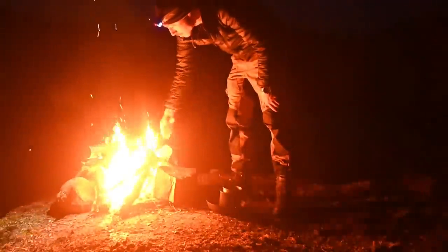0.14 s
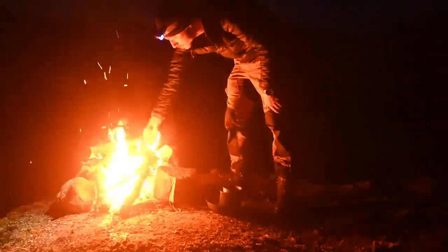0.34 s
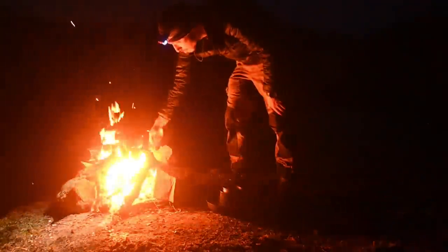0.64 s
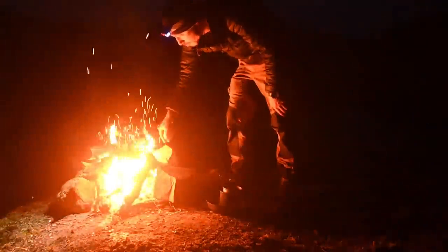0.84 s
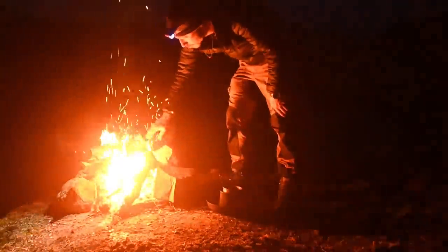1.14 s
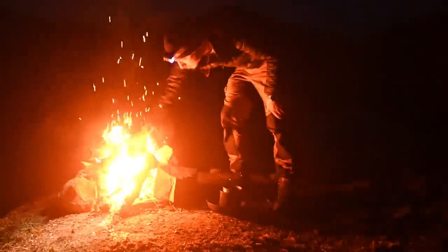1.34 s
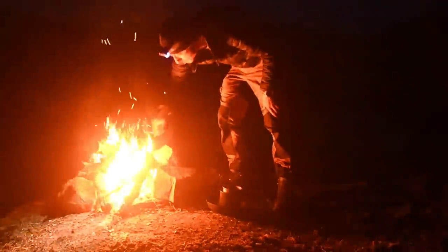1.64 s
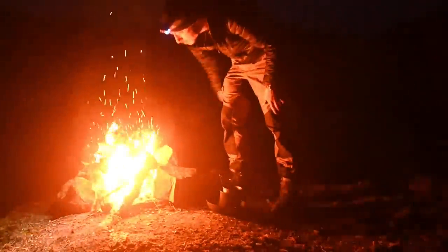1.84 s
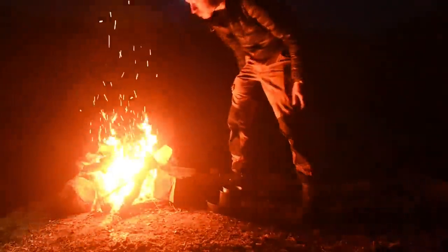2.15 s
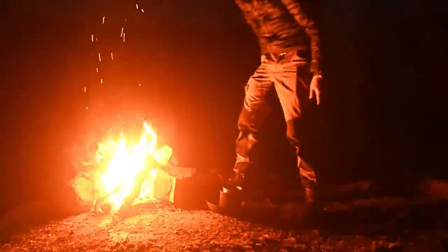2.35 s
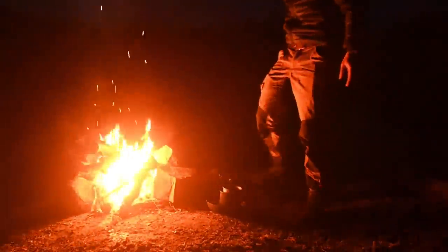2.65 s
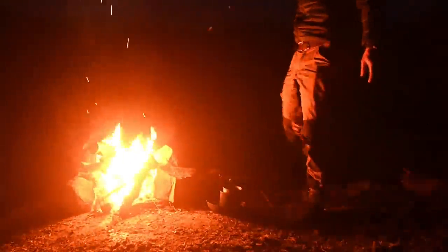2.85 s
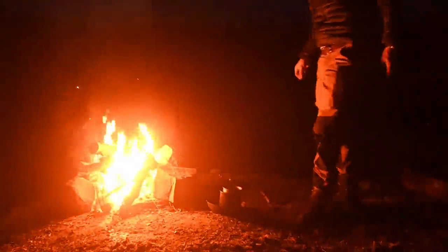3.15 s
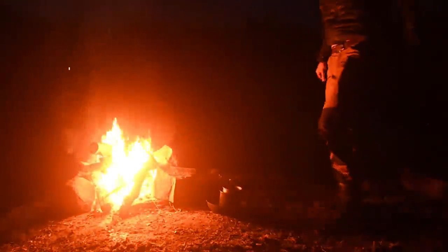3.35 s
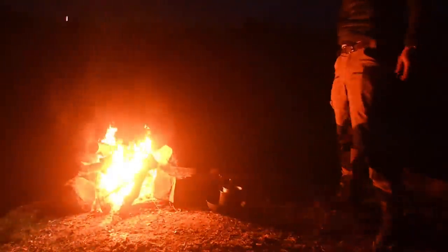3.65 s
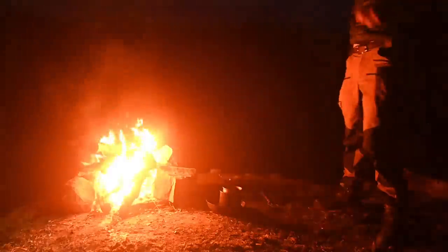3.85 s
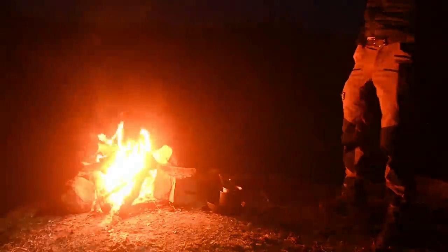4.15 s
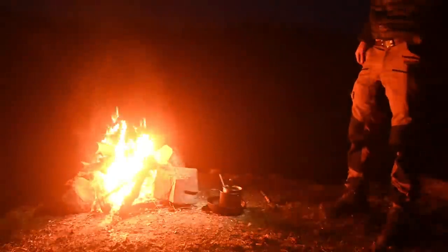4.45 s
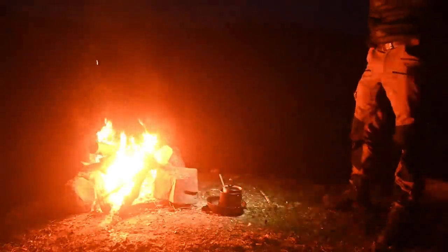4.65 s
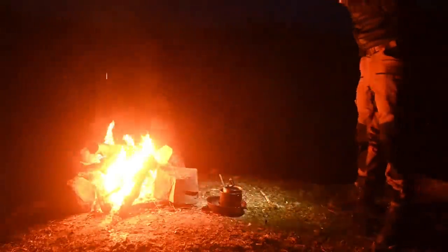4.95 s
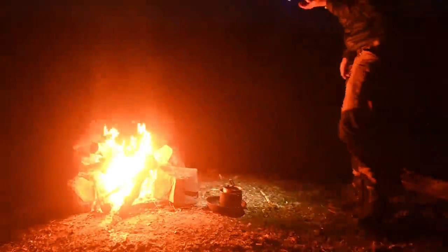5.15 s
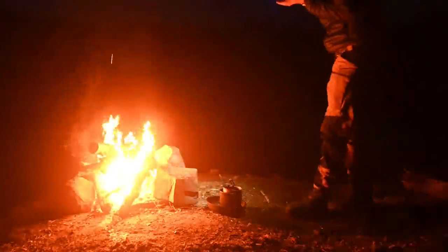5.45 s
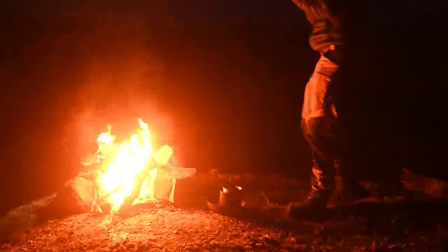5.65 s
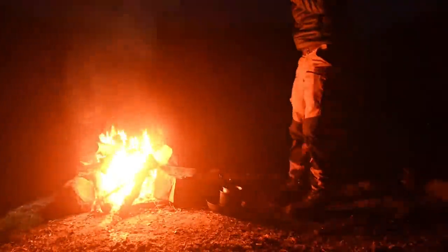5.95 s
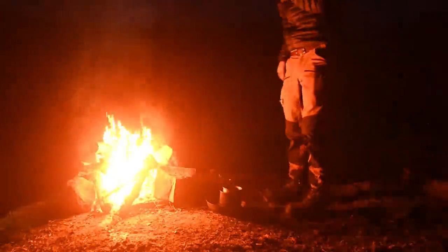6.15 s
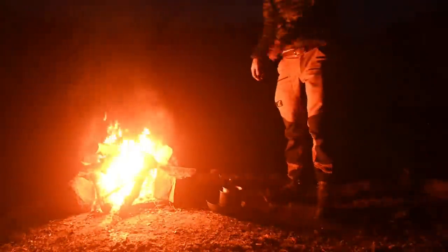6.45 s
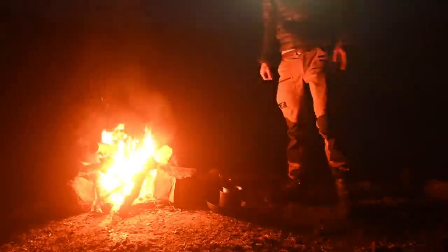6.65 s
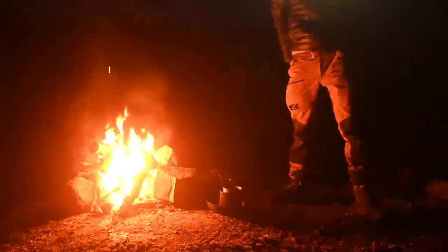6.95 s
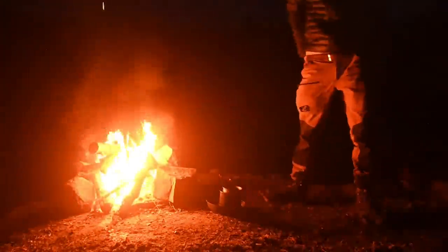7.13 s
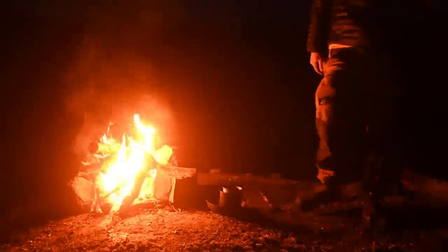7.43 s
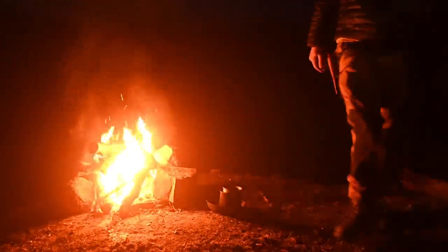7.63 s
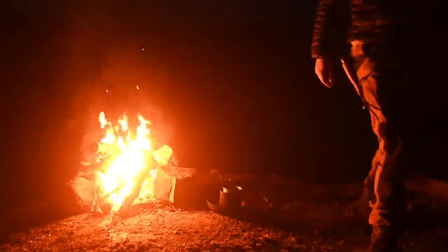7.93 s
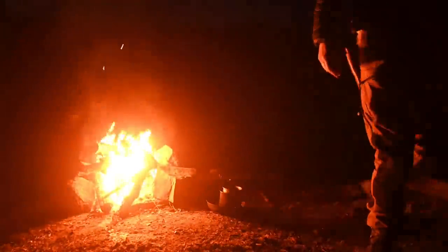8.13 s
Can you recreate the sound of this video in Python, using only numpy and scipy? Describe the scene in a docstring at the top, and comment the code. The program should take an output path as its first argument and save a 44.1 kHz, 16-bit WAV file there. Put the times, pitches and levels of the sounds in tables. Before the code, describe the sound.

Outdoors at night, a continuous high peeping of many frogs dominates, each call a quick upward glide that stops short. Several individuals repeat every second or so above the blurred distant crowd. A small wood fire close to the microphone adds a low soft roar, bright ember ticks and occasional hollow pops. Early on, wood rustles and knocks as it is moved and a log briefly scrapes; later come light steps on dry ground and a thicker run of pops.

```python
"""A lake shore at night: hundreds of small frogs whistle rising peeps; the nearer ones stand out one by one.
Each peep is a gliding stack of sine partials; the far chorus calls at random through stronger scatter.
A campfire roars softly and hisses in coloured noise; its ticks and pops are short struck resonances.
Beside it someone shifts wood and steps on dry ground: strokes of dense grains, and scrapes of peaked noise."""
import sys
import numpy as np
from scipy import signal
from scipy.fft import rfft, irfft
from scipy.io import wavfile

SR = 44100
rng = np.random.default_rng(int(sys.argv[2]) if len(sys.argv) > 2 else 0)


def unload_audio(sound):
    """Save the sound as a 16-bit wav file, at the path given as the first command line argument."""
    columns = np.transpose(np.atleast_2d(sound))
    # keep every value between -1 and 1, then stretch to whole-number steps
    steps = np.round(np.clip(columns, -1, 1) * 32767)
    wavfile.write(sys.argv[1], SR, steps.astype(np.int16))


N = 365588


def from_db(db):
    """Amplitude gain of a level in dB."""
    return 10 ** (np.asarray(db) / 20)


def rms_one(x):
    """Scale to unit rms."""
    return x / np.sqrt(np.mean(x ** 2) + 1e-20)


def add(out, start_s, sound):
    """Mix a sound in at a time, trimmed to the scene."""
    at = round(start_s * SR)
    first = max(at, 0)
    last = max(min(at + len(sound), N), 0)
    out[first:last] += sound[first - at:][:max(last - first, 0)]


def peep(length_s, start_hz, end_hz, bend, db, turn, partials):
    """One whistle, the 2nd partial of the voice: swells, glides, sags and stops short as the throat shuts."""
    t = np.arange(round(length_s * SR)) / SR
    u = t / length_s
    whistle_hz = start_hz + (end_hz - start_hz) * (u + bend * u * (1 - u))
    phase = 2 * np.pi * (turn + np.cumsum(whistle_hz) / (2 * SR))   # of the fundamental
    gate = np.clip(np.minimum(t / 0.033, (length_s - t) / 0.0055), 0, 1)
    swell = np.sin(np.pi / 2 * gate) ** 2
    voice = np.sin(2 * phase) * from_db(-6 * u ** 3)
    growth_db = -3.5 + 4.56 * u   # overtones grow as the call goes on
    for partial, rel_db in partials:
        voice += from_db(rel_db + growth_db) * np.sin(partial * phase)
    return from_db(db) * swell * voice


# Single clear peeps. Each row: start in seconds, length in seconds, end pitch in Hz, level in dB.
SINGLE_PEEPS = [(-.021, .12, 2976, -24), (-.02, .15, 3097, -32.5), (0.487, 0.16, 3090, -34),
                (.565, .11, 2714, -34), (.619, 0.15, 2973, -36.5), (0.802, .133, 3010, -31),
                (0.952, 0.22, 3002, -25.5), (1.142, 0.28, 3207, -33), (1.209, .23, 3024, -24),
                (1.332, .23, 2880, -42), (1.662, .2, 3000, -32), (1.916, 0.29, 3153, -35),
                (2.131, .19, 2730, -37), (2.282, 0.2, 2740, -38), (2.36, 0.2, 3035, -25.5),
                (2.592, .19, 2963, -33.5), (2.605, .23, 2973, -27.5), (2.642, .13, 2850, -25),
                (2.973, 0.14, 3150, -31), (3.094, 0.22, 3020, -31), (3.277, 0.22, 2900, -32.5),
                (3.444, 0.21, 2802, -37), (3.582, .16, 3170, -31), (3.901, 0.16, 2723, -37),
                (3.968, .18, 3020, -27), (4.132, 0.16, 3042, -27), (4.178, .16, 2876, -24),
                (4.279, .22, 3090, -32), (4.527, 0.17, 2922, -29), (4.698, 0.21, 2900, -33),
                (4.81, .11, 3010, -33), (5.052, 0.19, 3190, -38.5), (5.168, .21, 3190, -34),
                (5.36, 0.21, 3107, -30.5), (5.464, .23, 3080, -27.5), (5.52, 0.15, 2990, -27),
                (5.524, .25, 2960, -31.5), (5.713, 0.15, 2992, -24), (6.018, 0.19, 2900, -31),
                (6.275, 0.16, 2984, -30), (6.461, .22, 3075, -31), (6.524, .2, 2950, -36),
                (6.624, .2, 2935, -40), (6.785, 0.19, 3001, -25.5), (6.928, 0.18, 2690, -39),
                (6.963, .13, 2846, -31), (7.068, 0.25, 3037, -24), (7.103, .19, 2902, -26.5),
                (7.302, .16, 3040, -29), (7.46, .16, 2804, -32.5), (7.544, .17, 3005, -31.5),
                (7.629, 0.18, 3144, -27), (7.887, 0.28, 3050, -36.5), (8.081, .17, 2780, -39)]
# Frogs with a voice of their own, calling again and again. Each row: a voice (start pitch in Hz,
# end pitch in Hz, bend of the glide, level in dB, overtones in dB re whistle before colour and growth),
# length in seconds, list of call times in seconds.
STEADY_CALLERS = [((2960, 3400, .5, -20.6, -37), .176, [.33, 1.812, 3.124, 4.74, 6.575, 8.108]),
                  ((2790, 3125, .6, -28.5, -27), .145, [.15, 2.05, 4.768, 6.148, 7.43]),
                  ((2680, 3050, .2, -30, -27), .145, [.5, 1.662, 2.943, 4.393, 5.953, 7.212]),
                  ((2375, 2745, .25, -31.5, -43), .19, [.93, 2.362, 3.712, 5.217, 6.51, 8.176]),
                  ((2305, 2660, -.35, -44, -44), .28, [.178, 1.523, 2.912, 4.379, 5.99, 7.362])]
# Colour of the other partials. Each row: partial frequency in Hz, dB added to the overtone level.
OVERTONE_COLOUR = [(1500, -4.5), (4300, -4.5), (5000, 2), (6000, 2.5), (7300, -6), (8500, -13),
                   (10200, -20.5), (11700, -5.5)]
# glide shared by the single peeps: longer ones climb further
RISE_HZ, RISE_HZ_PER_S, BEND = 130.07, 1250, 0.1994
PEEP_OVERTONES_DB, OVERTONE_SPREAD_DB = -45, 3.5   # throats differ in brightness


def near_frogs():
    """Every listed call, with those partials that are loud enough to hear."""
    out = np.zeros(N)
    colour_hz, colour_db = np.transpose(OVERTONE_COLOUR)
    others = np.array([1, 3, 4, 5, 6, 7])
    calls = [(s, length_s, *voice) for voice, length_s, times in STEADY_CALLERS for s in times]
    brightness = rng.standard_normal(len(SINGLE_PEEPS))
    for (s, length_s, end_hz, db), odd in zip(SINGLE_PEEPS, brightness):
        start_hz = end_hz - RISE_HZ - RISE_HZ_PER_S * length_s
        overtones_db = PEEP_OVERTONES_DB + OVERTONE_SPREAD_DB * odd
        calls.append((s, length_s, start_hz, end_hz, BEND, db, overtones_db))
    turns = rng.random(len(calls))
    for (s, length_s, start_hz, end_hz, bend, db, overtones_db), turn in zip(calls, turns):
        partial_hz = others * (start_hz + end_hz) / 4
        rel_db = overtones_db + np.interp(partial_hz, colour_hz, colour_db)
        heard = db + rel_db > -88
        partials = zip(others[heard], rel_db[heard])
        add(out, s, peep(length_s, start_hz, end_hz, bend, db, turn, partials))
    return out


FAR_COUNT, FAR_RMS_DB, FAR_SPREAD_DB = 850, -31, 4   # peeps in all, chorus level, spread between peeps
FAR_HZ, FAR_SPREAD_HZ, FAR_TOP_HZ = 2874, 135, 3284   # mid-glide pitch, its spread, usual ceiling
FAR_PARTIALS_DB = [(1, -31.5), (3, -34.5), (4, -40)]   # partial number, dB re whistle before growth


def far_frogs():
    """The rest of the pond calls at random; distance strips the upper overtones."""
    out = np.zeros(N)
    draws = np.c_[rng.random((FAR_COUNT, 2)), rng.standard_normal((FAR_COUNT, 5))]
    # steady callers keep the chorus even: one peep per time slot
    for slot, (when, turn, odd_length, odd_pitch, odd_rise, odd_bend, odd_db) in enumerate(draws):
        length_s = np.clip(.16 + 0.02525 * odd_length, .1, .25)
        rise_hz = length_s * (1900 + 300 * odd_rise)
        end_hz = FAR_HZ + FAR_SPREAD_HZ * max(odd_pitch, -1.9) + rise_hz / 2
        end_hz = min(end_hz, FAR_TOP_HZ + 40 * odd_bend)
        call = peep(length_s, end_hz - rise_hz, end_hz, 0.1998 * odd_bend,
                    FAR_SPREAD_DB * odd_db, turn, FAR_PARTIALS_DB)
        add(out, (slot + when) / FAR_COUNT * (N / SR + .25) - .25, call)
    return from_db(FAR_RMS_DB) * rms_one(out)


SHORE_T60_S, NEAR_WET_DB, FAR_WET_DB = 0.57, -12, -4


def shore(x, wet_db):
    """Scatter off trees and bank: a dense, dying noise tail follows the direct sound."""
    t = np.arange(SR // 2) / SR
    tail = rng.standard_normal(len(t)) * from_db(-60 * t / SHORE_T60_S) * (t > .008)
    tail /= np.sqrt(np.sum(tail ** 2))
    return x + from_db(wet_db) * signal.fftconvolve(x, tail)[:N]


def coloured(x, spectrum):
    """Give a white signal a spectrum, interpolated over log frequency; rms 1."""
    hz, db = np.transpose(spectrum)
    bins_hz = np.maximum(np.arange(N // 2 + 1) * SR / N, 1)
    gain = from_db(np.interp(np.log(bins_hz), np.log(hz), db))
    return rms_one(irfft(rfft(x) * gain, N))


def drift(rate_hz):
    """Slow chance: random points joined by lines, spread 1 at the points."""
    steps = int(N / SR * rate_hz) + 2
    return np.interp(np.arange(N) / SR * rate_hz, np.arange(steps), rng.standard_normal(steps))


def ring(clicks, hz, cycles):
    """A unit click sets a sine ringing that dies by 60 dB in so many cycles."""
    r = from_db(-60 * hz / (cycles * SR))
    w = 2 * np.pi * hz / SR
    return signal.lfilter([0, np.sin(w)], [1, -2 * r * np.cos(w), r * r], clicks + 1e-18)


def snaps(events, cycles, crack_db, gain_db):
    """Each snap: a click and a brief dying noise crack strike a resonance of a few cycles."""
    out, t = np.zeros(N), np.arange(1200) / SR
    noises = rng.standard_normal((len(events), 1200))
    for (s, db, hz), noise in zip(events, noises):
        crack = from_db(crack_db) * noise * np.exp(-t * hz / cycles)
        add(out, s, from_db(db + gain_db) * ring((t == 0) + crack, hz, cycles))
    return out


def grains(per_s, low_hz, high_hz, cycles, uneven_db):
    """Random clicks of uneven size dealt to eight short resonances; rms 1."""
    size_db = uneven_db * np.minimum(rng.exponential(1, N), 5)
    clicks = (rng.random(N) < per_s / SR) * from_db(size_db)
    dealt, pitches_hz = rng.integers(0, 8, N), np.geomspace(low_hz, high_hz, 8)
    return rms_one(sum(ring(clicks * (dealt == k), hz, cycles) for k, hz in enumerate(pitches_hz)))


# Flame spectrum. Each row: frequency in Hz, relative level in dB per Hz.
ROAR_SPECTRUM = [(15, -4), (60, 1), (190, -0.5), (420, -7), (700, -6), (1200, -5.5), (2200, -4.5),
                 (3200, -6.5), (5000, -44.5)]
# Sap and ember spectrum. Each row: frequency in Hz, relative level in dB per Hz.
HISS_SPECTRUM = [(2200, -14.5), (3700, -1.5), (4400, -4.5), (5200, -6.5), (6500, -6), (8200, 1),
                 (10500, -11), (12800, -4.5), (14500, -9), (16500, -10.5)]
# Swing of the sap's hiss, used about its mean. Each row: time in seconds, level in dB before scaling.
SIZZLE_SWING = [(0.0, -69), (0.44, -62), (1.18, -68.5), (1.5, -60.5), (1.71, -68), (2.38, -66.5),
                (3.42, -72.5), (4.13, -68.5), (5.42, -71.5), (8.29, -65)]
# Embers crack. Each row: start in seconds, level in dB, pitch in Hz, level of the highest treble in dB;
# levels before the snap gain.
EMBER_TICKS = [(.266, -35, 6250, -56), (.4773, -36, 5040, -48), (.5526, -33, 6000, -38),
               (.6389, -31, 8140, -42), (.671, -25.5, 7740, -35), (.941, -37, 8350, -60),
               (1.3806, -31, 8000, -51), (1.4284, -24.5, 8020, -45), (1.5597, -32, 7940, -53),
               (1.579, -31.5, 7100, -57), (1.7625, -32, 5900, -69), (1.9428, -29, 8400, -34),
               (1.9987, -25.5, 5370, -56), (2.3567, -32, 7760, -58), (2.391, -36, 5200, -66),
               (2.622, -28.5, 7400, -33), (2.6643, -47, 4670, -38), (2.777, -26, 11500, -40),
               (3.4611, -33, 6200, -67), (3.5627, -38, 7380, -55), (3.7399, -34, 4700, -53),
               (3.7523, -18, 12400, -48), (3.916, -27.5, 8100, -52), (3.9421, -27.5, 8000, -51),
               (4.1288, -35.5, 7770, -53), (4.211, -26, 5500, -43), (4.225, -21.5, 7700, -44),
               (4.4154, -44, 5540, -43), (4.427, -39, 5900, -32), (4.9302, -49, 4591, -36),
               (5.0794, -35, 7840, -60), (5.853, -43, 8300, -58), (5.92, -35, 8300, -67),
               (6.0575, -46, 10500, -54), (6.292, -39, 5600, -55), (6.3131, -46, 4700, -48),
               (6.9472, -35, 8300, -47), (7.0955, -34, 8300, -55), (7.2435, -34.5, 5700, -54),
               (7.4607, -43, 5930, -48), (7.79, -34, 5910, -54), (7.9473, -36.5, 7450, -54)]
# Wood pops and knocks. Each row: start in seconds, level in dB before the snap gain, pitch in Hz.
WOOD_POPS = [(0.491, -41, 845), (1.446, -37, 317), (1.499, -36.5, 258), (1.588, -44, 300),
             (1.996, -20.5, 1420), (2.029, -36.5, 834), (2.52, -28.5, 610), (2.554, -38, 697),
             (2.69, -33, 474), (2.786, -34.5, 1130), (3.646, -40, 410), (3.747, -44, 1920),
             (3.938, -39, 1510), (4.225, -33.5, 503), (4.256, -32, 1500), (5.466, -43, 393),
             (5.971, -28, 1920), (6.031, -33.5, 1620), (6.591, -37, 1610), (7, -32, 925), (7.039, -33, 418),
             (7.094, -26.5, 955), (7.251, -43, 466), (7.786, -31.5, 940), (7.812, -26.5, 1420),
             (7.938, -32, 1490), (7.986, -29, 1550), (8.015, -28, 990), (8.215, -33.5, 620),
             (8.257, -35, 1010)]
ROAR_DB, HISS_DB = -55.5, -63.5   # before drift and swing
SIZZLE_FOLLOWS = 0.86   # share of the swing in hiss and crackle


def fire():
    """Fluttering roar, hiss, fine random crackle and patter, and the listed ticks and pops."""
    roar = from_db(ROAR_DB + 3.17 * drift(18)) * coloured(rng.standard_normal(N), ROAR_SPECTRUM)
    sizzle_db = np.interp(np.arange(N) / SR, *np.transpose(SIZZLE_SWING))
    sizzle_db = SIZZLE_FOLLOWS * (sizzle_db - sizzle_db.mean())
    hiss_db = HISS_DB + sizzle_db + 0.47 * drift(5.6)
    hiss = from_db(hiss_db) * coloured(rng.standard_normal(N), HISS_SPECTRUM)
    crackle = from_db(-67.5 + sizzle_db) * grains(50, 5000, 13000, 12, uneven_db=3.5)
    patter = from_db(-68.0) * grains(49, 200, 900, 3, uneven_db=0.5)
    bodies = [(s, db, hz) for s, db, hz, top_db in EMBER_TICKS]
    edges = [(s, top_db, 13200) for s, db, hz, top_db in EMBER_TICKS]   # the sharp edge of each tick
    ticks = snaps(bodies, 7.7, crack_db=-11.5, gain_db=2.25) + snaps(edges, 8.2, crack_db=-9.5, gain_db=2)
    pops = snaps(WOOD_POPS, 5.2, crack_db=-22.5, gain_db=1.6)
    return roar + hiss + crackle + patter + ticks + pops


# Strokes on wood and dry ground; the long one at 2.04 s is a hiss of sap.
# Each row: start in seconds, length in seconds, crisp part in dB, dull part in dB.
RUSTLE_STROKES = [(0.466, 0.23, -49.5, -53.5), (1.293, 0.22, -54.5, -67.5), (1.408, 0.084, -42.5, -39.5),
                  (1.479, 0.063, -53, -60.5), (1.54, 0.081, -50.5, -70.5), (2.042, 0.55, -57.5, -77.5),
                  (2.446, .06, -59, -69.5), (2.637, .12, -50.5, -53), (4.218, 0.042, -55.5, -53.5),
                  (4.242, 0.079, -60, -51), (5.45, 0.13, -68, -59), (5.954, 0.072, -53.5, -51.5),
                  (6.53, 0.16, -60, -69), (7.047, 0.087, -55, -64.5), (7.23, 0.071, -57, -46),
                  (7.95, 0.42, -69, -64)]


def rustle():
    """Twigs and gravel in strokes, and one hiss of sap: crisp grains above, duller crunch below."""
    t, crisp, dull = np.arange(N) / SR, 0, 0
    for s, length_s, crisp_db, dull_db in RUSTLE_STROKES:
        knots_s = [s, s + 0.19 * length_s, s + 0.67 * length_s, s + length_s]
        # the faint end values hold outside the stroke
        stroke = np.interp(t, knots_s, [0.017, 0.66, 1.0, 0.022])
        crisp = crisp + from_db(crisp_db) * stroke
        dull = dull + from_db(dull_db) * stroke
    crisp_grains = coloured(grains(4000, 3000, 15000, 5, uneven_db=3), HISS_SPECTRUM)
    crunch = grains(1100, 370, 2500, 6.3, uneven_db=5.0)
    return crisp * crisp_grains + dull * crunch


# A log slides. Each row: start in seconds, length in seconds, level in dB.
LOG_SLIDES = [(2.679, 0.19, -44), (6.585, 0.2, -55)]
# Peaks in the tone of the scrape, near evenly spaced, as a close reflection makes them.
# Each row: frequency in Hz, width in Hz, relative level in dB.
SCRAPE_PEAKS = [(433, 72, -14), (786, 83, -4.5), (1140, 140, 1.5), (1490, 110, -2), (1760, 130, -5.5)]


def scrapes():
    """Uneven friction noise, peaked by resonant filters, under a stroke that fades and then stops."""
    t, stroke = np.arange(N) / SR, 0
    for s, length_s, db in LOG_SLIDES:
        stroke = stroke + from_db(db) * np.interp(t, [s, s + 0.0078, s + length_s], [0, 1, .3], right=0)
    rub = rng.standard_normal(N) * from_db(3.1 * drift(60))
    tone = 0
    for hz, width_hz, db in SCRAPE_PEAKS:
        tone = tone + from_db(db) * rms_one(ring(rub, hz, 2.2 * hz / width_hz))
    return stroke * rms_one(tone)


def scene():
    """Frogs across the water, fire and feet close by."""
    frogs = shore(near_frogs(), NEAR_WET_DB) + shore(far_frogs(), FAR_WET_DB)
    return (frogs + fire() + rustle() + scrapes())[None]


BASS_CUT_HZ, CUTOFF_HZ = 157, 15800


def record(dry):
    """The microphone loses bass; a steep low-pass cuts the top."""
    bass_cut = signal.butter(2, BASS_CUT_HZ, "high", fs=SR, output="sos")
    top_cut = signal.ellip(12, .5, 70, CUTOFF_HZ, fs=SR, output="sos")
    return signal.sosfilt(top_cut, signal.sosfilt(bass_cut, dry))


dry = scene()
out = record(dry)
unload_audio(out)
```